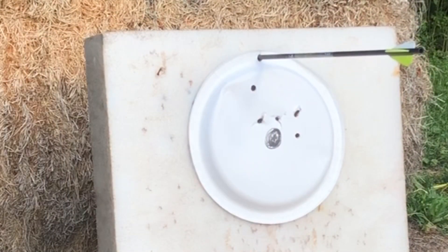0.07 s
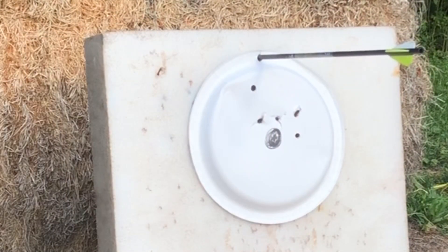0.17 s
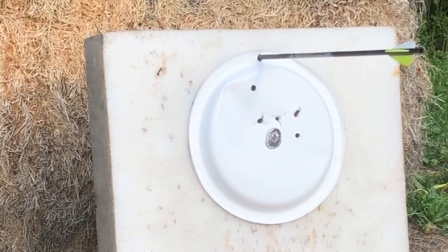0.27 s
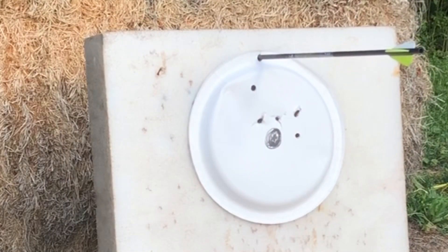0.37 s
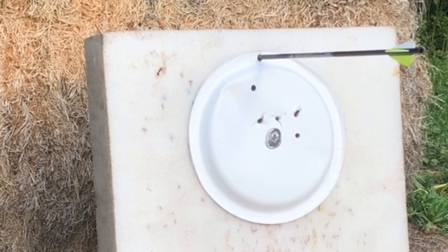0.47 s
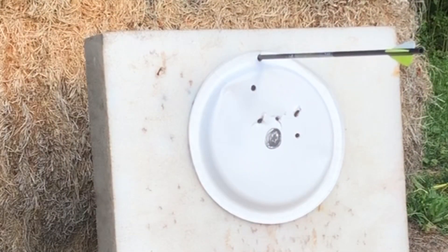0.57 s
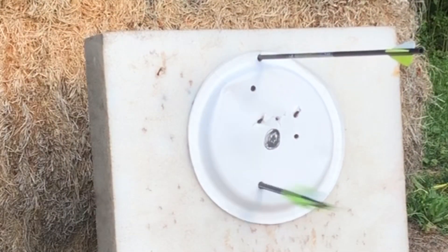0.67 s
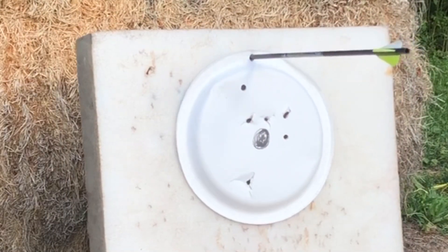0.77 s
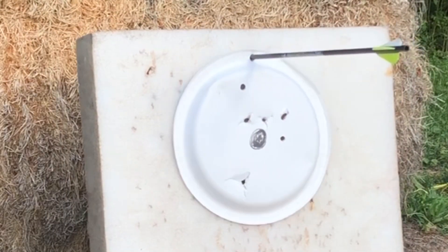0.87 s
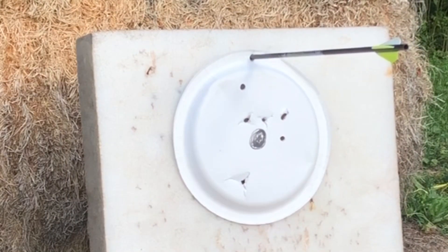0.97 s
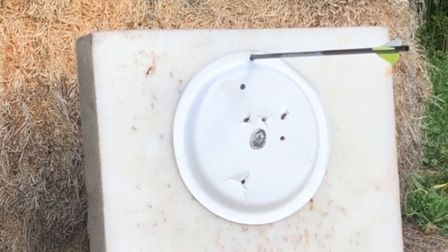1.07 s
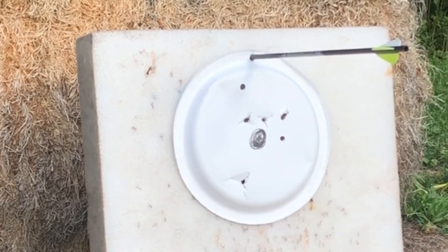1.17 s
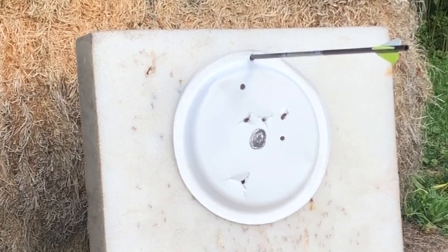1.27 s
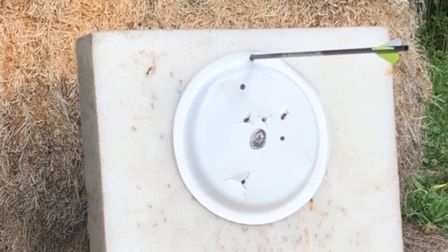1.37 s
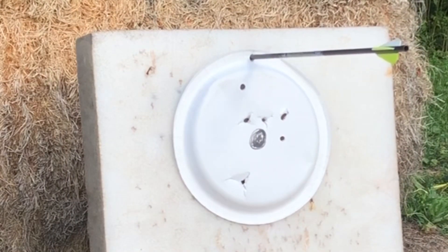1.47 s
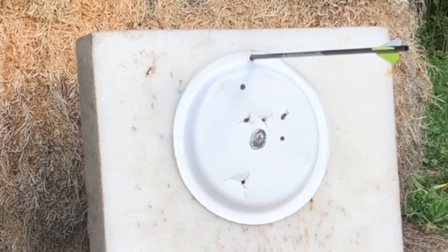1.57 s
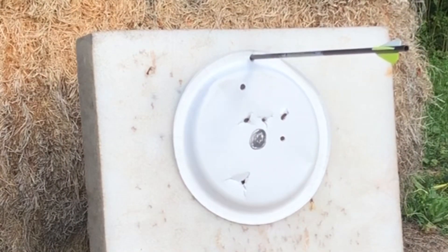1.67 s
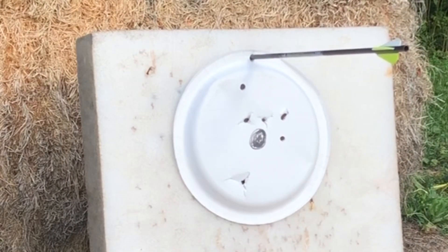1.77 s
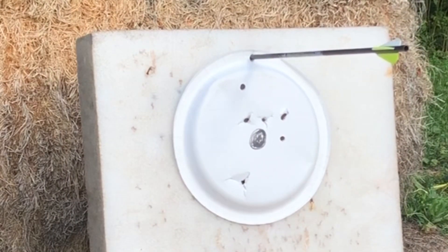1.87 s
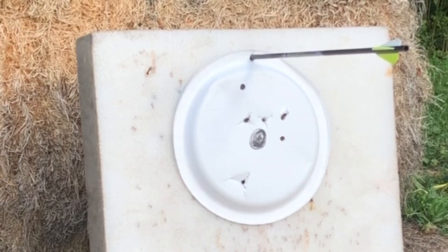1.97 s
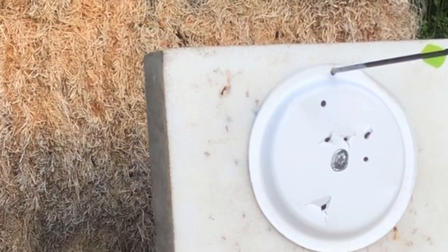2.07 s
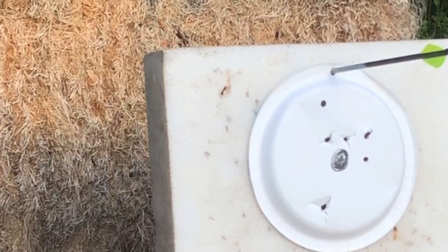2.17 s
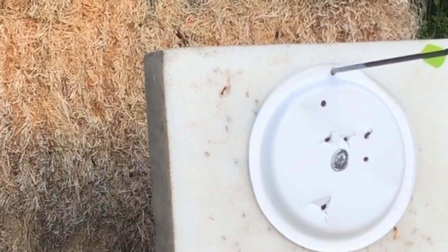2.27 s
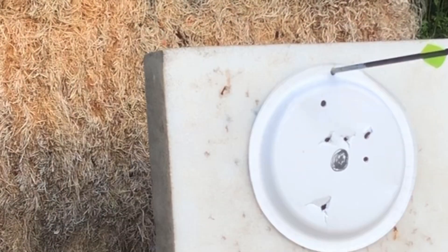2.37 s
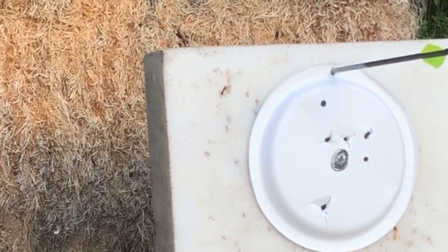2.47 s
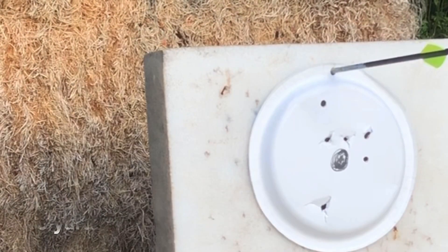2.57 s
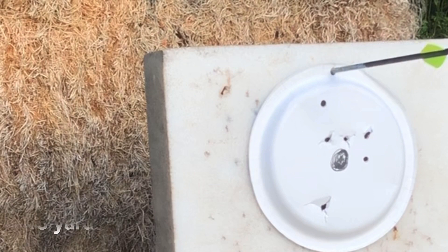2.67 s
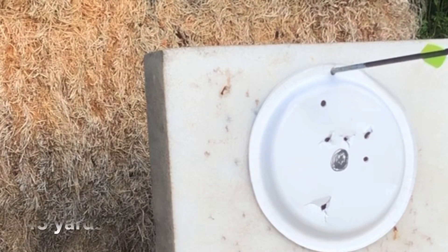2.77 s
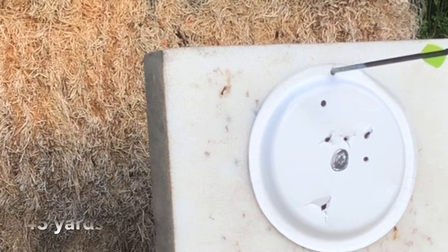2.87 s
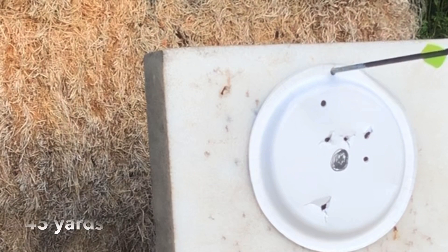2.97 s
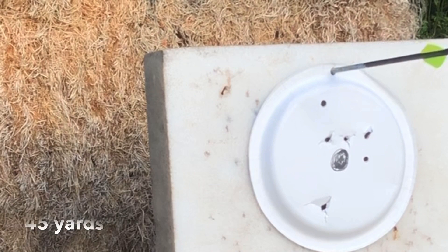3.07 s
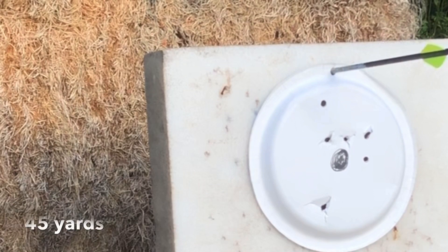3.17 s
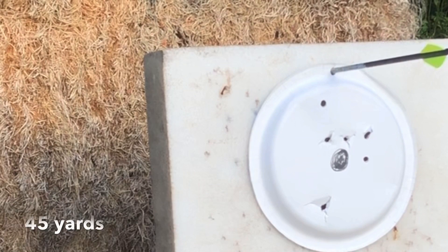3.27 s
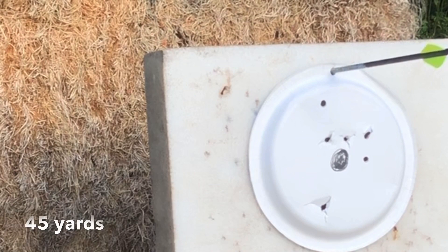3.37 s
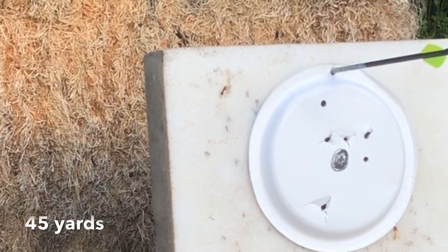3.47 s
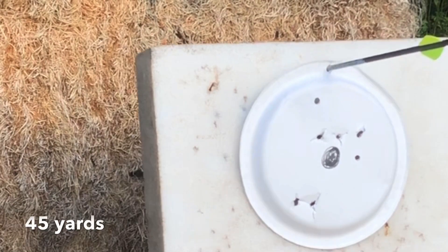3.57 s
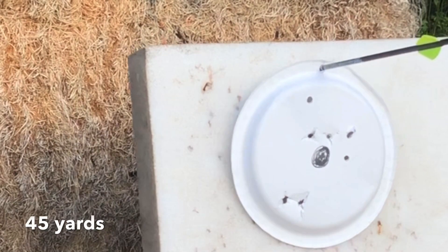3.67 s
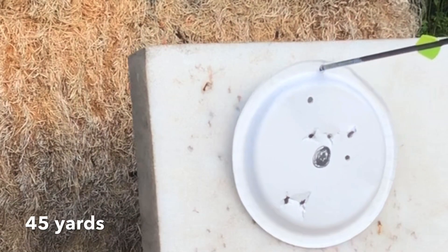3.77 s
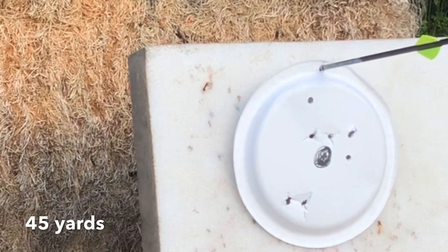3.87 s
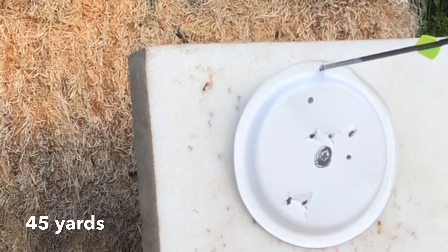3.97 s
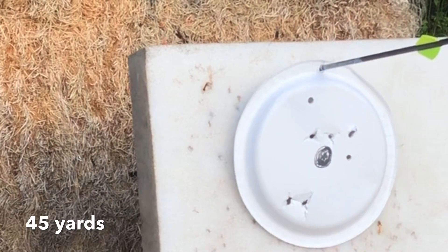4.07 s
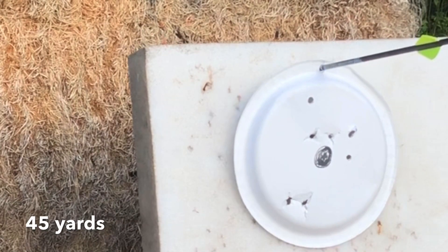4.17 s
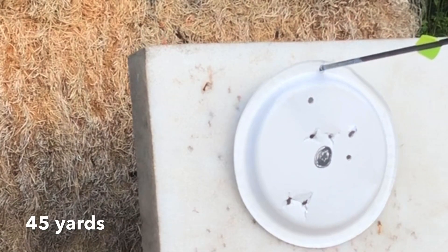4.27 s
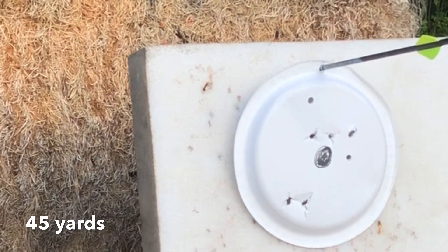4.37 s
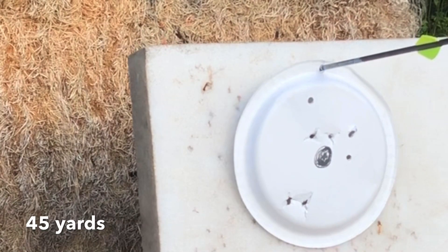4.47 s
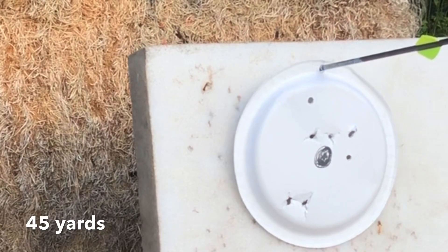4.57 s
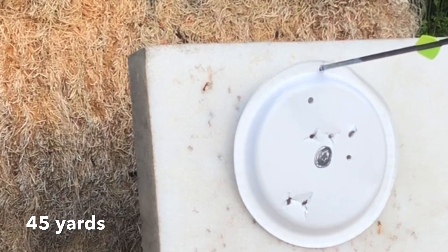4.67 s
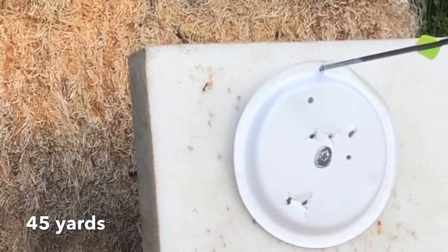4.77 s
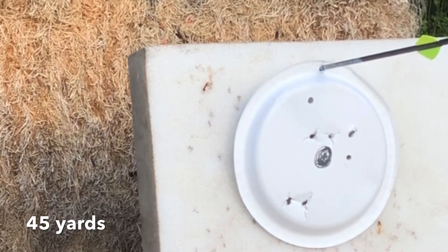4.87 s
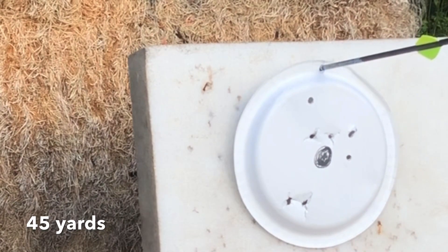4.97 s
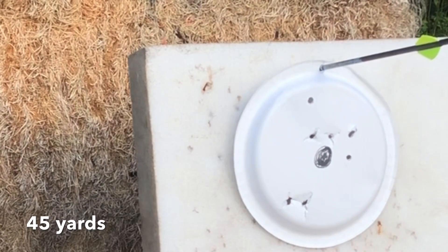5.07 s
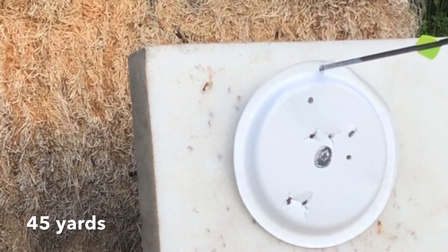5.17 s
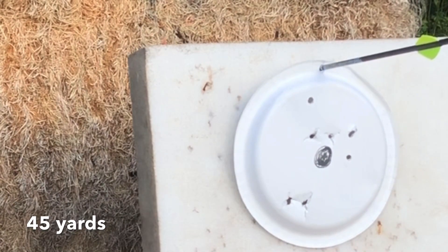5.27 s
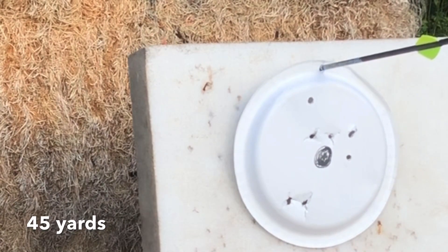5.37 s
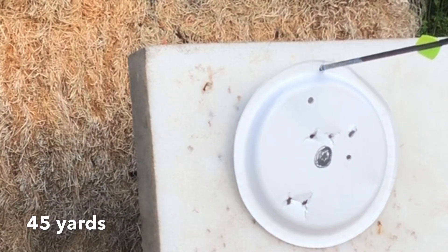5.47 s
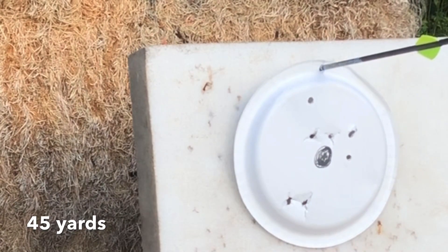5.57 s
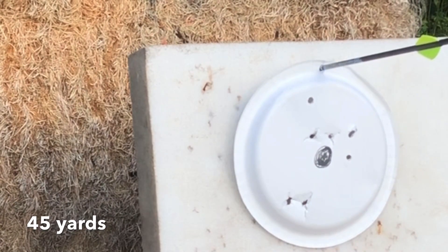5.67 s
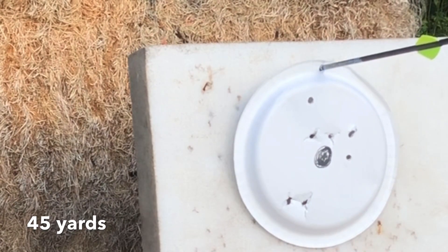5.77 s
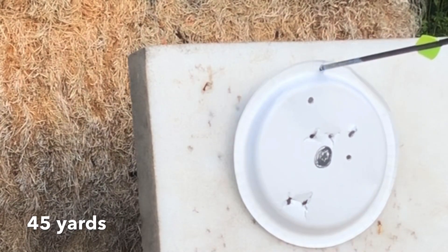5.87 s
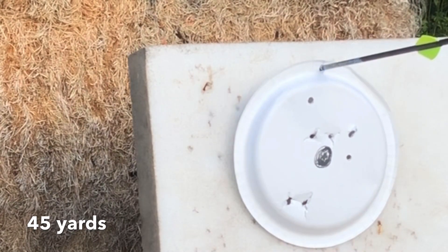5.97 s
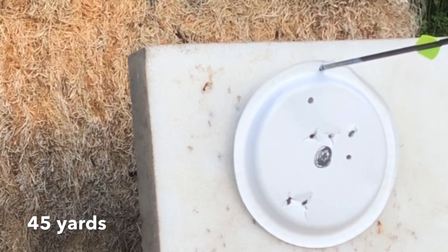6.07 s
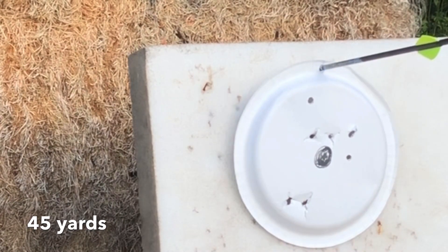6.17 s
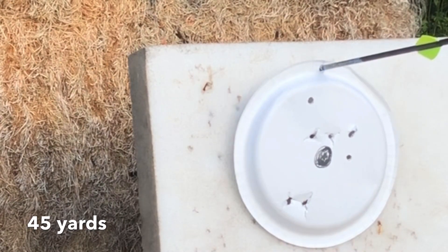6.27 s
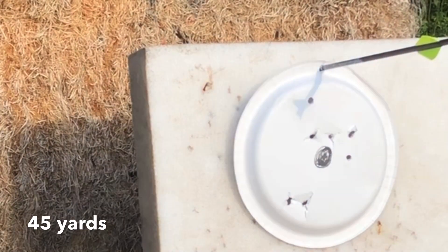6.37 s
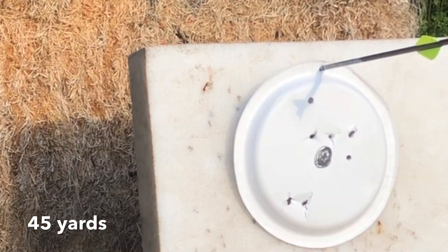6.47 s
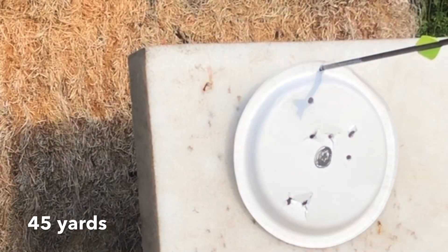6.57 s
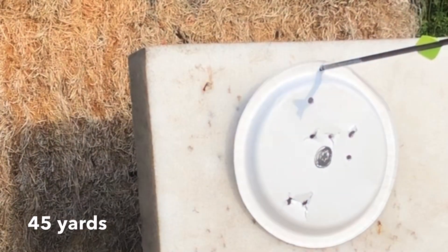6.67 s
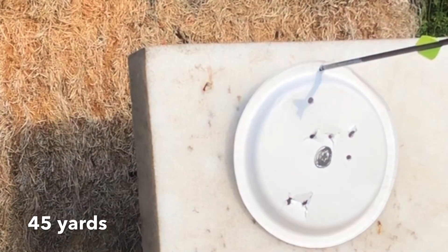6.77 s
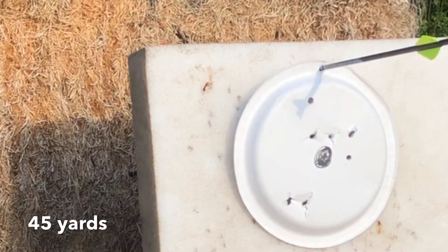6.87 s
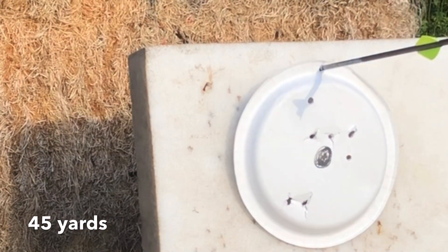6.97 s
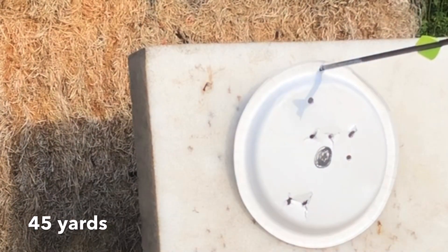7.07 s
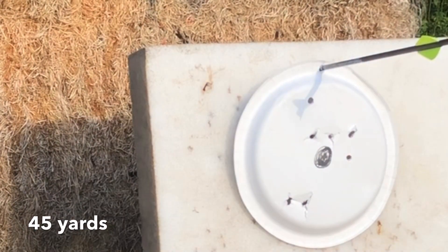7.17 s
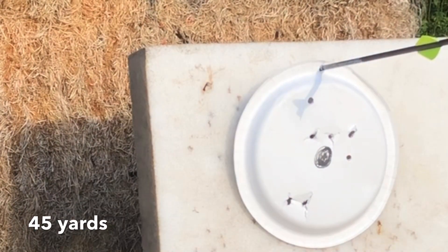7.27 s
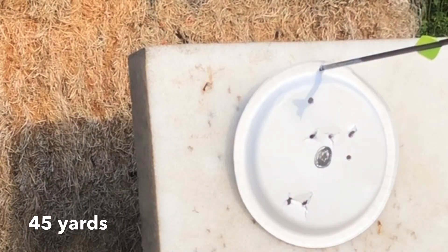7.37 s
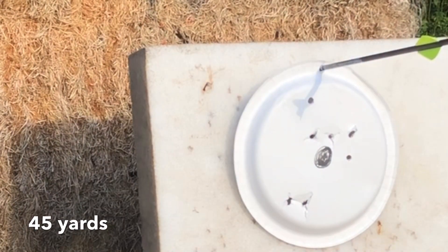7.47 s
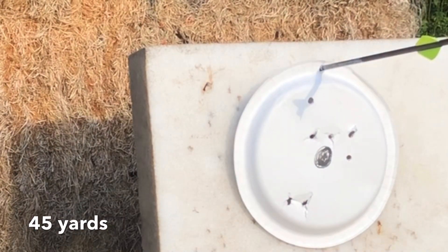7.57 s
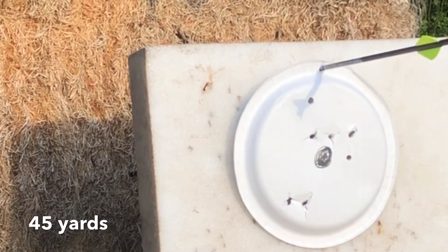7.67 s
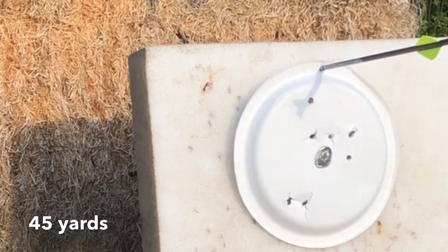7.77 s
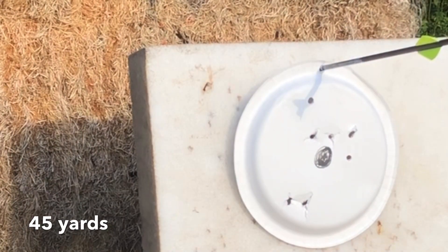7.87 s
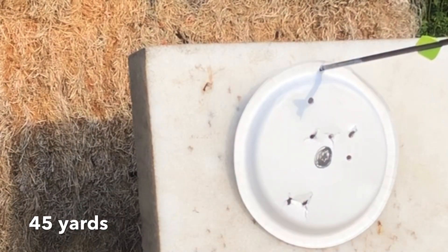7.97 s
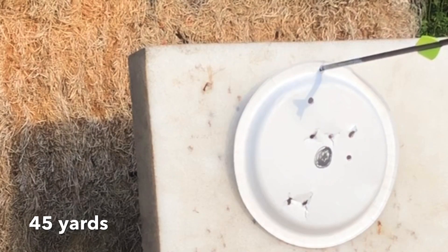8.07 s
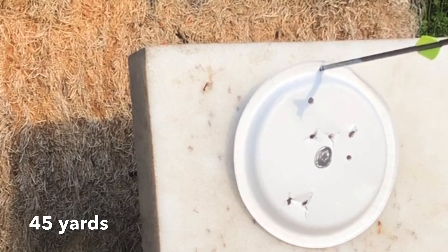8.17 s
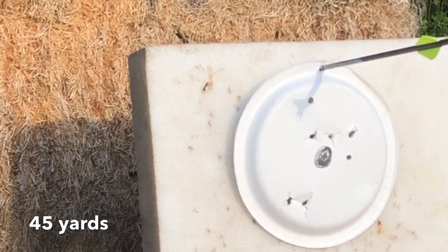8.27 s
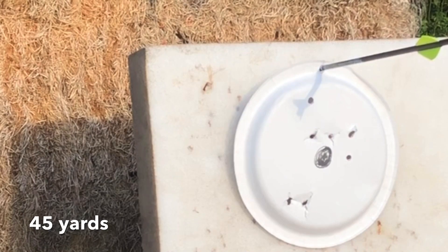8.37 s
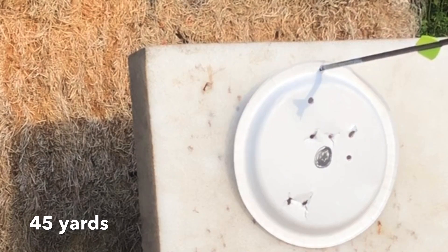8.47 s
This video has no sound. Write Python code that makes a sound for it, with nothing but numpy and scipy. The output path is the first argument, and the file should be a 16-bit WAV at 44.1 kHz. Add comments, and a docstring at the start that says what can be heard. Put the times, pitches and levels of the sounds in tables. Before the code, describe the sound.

Outdoors, crickets drone steadily over a low rumble and a fading far engine. A distant bow snaps, a bolt hisses in, and a very loud double crack with a dull foam thump bursts close to the microphone, echoing in the trees. After a cut the breeze buffets more and a second shot does the same. After another cut it is calm until a faint third bow snap at the very end.

```python
"""Crickets drone over a low rumble in a summer field, with a far engine that fades and faint bird calls.
A far bow snaps; the bolt hisses in past the microphone, cracks a paper plate and thumps the foam block beside it.
A second shot follows, and a third bow snap, fainter, whose bolt does not land before the end.
Filtered noise makes snaps, hiss and cracks; damped modes ring bow, plate and block; trees and ground answer.
Three takes are joined by cuts, each with its own background levels; loud cracks turn down the recorder's gain."""
import sys
import numpy as np
from scipy import signal
from scipy.fft import rfft, irfft
from scipy.io import wavfile
from scipy.ndimage import uniform_filter1d

SR = 44100
rng = np.random.default_rng(int(sys.argv[2]) if len(sys.argv) > 2 else 0)


def dump(signal):
    """Clip the signal to [-1, 1] and save it as 16-bit WAV at the path in sys.argv[1]."""
    limited = np.clip(np.atleast_2d(signal).T, -1, 1)
    pcm = np.round(limited * 32767).astype(np.int16)
    wavfile.write(sys.argv[1], SR, pcm)


N = 375732
TIME = np.arange(N) / SR  # s

# Three takes joined by cuts. Each row: start in seconds, depth of the background's fade at that cut (0-1),
# rumble in dB, air in dB, crickets at the start in dB, their swell in dB/s, breeze at the start in dB,
# added near scatter in dB.
TAKES = [(0, 0, -46, -57, -54, 0.7, -56, -1.5), (2.095, 0.5, -48.5, -55.5, -55, -0.26, -38.5, 2.5),
         (6.362, 0.93, -47.5, -57, -54.5, 0, -50.5, .5)]
CUT_FADE_S = 0.019  # from the fade's centre to 1/e of its depth

# Colours of the background. Each row: frequency in Hz, relative level in dB per Hz.
RUMBLE_COLOUR = [(15, -37.5), (35, -18), (55, -5.5), (85, -3), (108, 0.5), (140, -8), (190, -7.5),
                 (250, -12.5), (330, -23), (600, -34.5), (2000, -76.5)]
DISTANT_AIR_COLOUR = [(100, -1), (330, 6), (600, -2), (1000, 0.5), (1500, -3), (2200, -10.5), (3200, -14.5),
                      (4600, -16), (9000, -21), (13000, -23.5), (16000, -22.5)]
CRICKET_CHORUS_COLOUR = [(5500, -50), (6400, -26.5), (6800, -15), (7080, -6.5), (7250, -4.5), (7370, -0.5),
                         (7520, -3.5), (7700, -6.5), (7950, -10.5), (8200, -22), (8900, -34),
                         (11000, -59.5)]
BUFFET_COLOUR = [(12, -35.5), (30, -17.5), (55, -3.5), (90, 1), (125, -0.5), (160, -8), (220, -24),
                 (400, -49.5), (2000, -89.5)]
BREEZE_FADE_DB_PER_S = 1.0  # the breeze slackens through each take

# Nearer crickets, then smaller insects. Each row: frequency in Hz, nominal width in Hz, relative level in dB.
NEAR_CRICKETS = [(7400, 70, -10), (7636, 50, -15), (7950, 20, -21)]
SMALL_INSECTS = [(5460, 690, 0), (10060, 110, -15), (14950, 420, -11.5)]
SMALL_INSECTS_DB = -14.5  # against the crickets

# The far engine picks up speed as it draws away.
ENGINE_START_HZ, ENGINE_TOP_HZ, ENGINE_REV_S = 207, 222, 0.6
ENGINE_START_DB, ENGINE_FADE_DB_PER_S = -40.5, 7.5

# Far birds. Each row: start in seconds, length in seconds, top pitch in Hz before waver, level in dB before
# the blur of the trees, frequency ratio of a second tone, its level in dB against the first.
BIRD_CALLS = [(2.366, 0.27, 2375, -64, 4 / 3, -8), (4.88, 0.22, 2330, -63, 4 / 3, -7.5),
              (7.629, .16, 2020, -63.5, 2, 1)]
# Blur of the calls. Each row: frequency in Hz, level in dB; then frequency in Hz, 60 dB decay time in s.
BIRD_BLUR_COLOUR = [(1000, -3), (5000, -4)]
BIRD_BLUR_T60 = [(1000, 0.75), (5000, 0.75)]

# Small dry ticks. Each row: start in seconds, level in dB.
DRY_TICKS = [(5.776, -59), (8.3535, -51), (8.3597, -43.5), (8.371, -46)]
# Their colour. Each row: frequency in Hz, relative level in dB per Hz.
TICK_COLOUR = [(1500, -25), (4000, 4), (9000, -2), (16000, -8)]

# Bow releases. Each row: time of the snap in seconds, level in dB, boost of the modes under 500 Hz in dB,
# whirr of the flying bolt in dB, flight time in seconds, frequency in Hz above which distance dulls the whirr.
BOW_RELEASES = [(.481, -16.5, 3, -36.5, 0.2, 12000), (3.3633, -16, 4.5, -38, .165, 14900),
                (8.376, -35.5, 4, -52.5, 0.33, 6500)]
# Limbs, string and stock. Each row: frequency in Hz, relative level in dB, 60 dB decay time in seconds.
BOW_MODES = [(210, -18.5, 0.058), (280, -15.5, 0.11), (376, -10, 0.078), (414.8, -16.5, .06),
             (527, -15, 0.067), (624, -15, 0.11), (1743, -12, 0.033), (2030, -14, .028),
             (2610, -18.5, 0.066), (3262, -10, .035), (3580, -6.5, .035), (4060, -11.5, 0.029),
             (4530, -13.5, 0.038), (5232, -18, 0.044)]
# Colours of the bow and its bolt. Each row: frequency in Hz, relative level in dB per Hz.
STRING_COLOUR = [(500, -31), (2200, -19.5), (3300, 0.5), (5000, -1.5), (6500, -18.5), (16000, -30.5)]
SNAP_COLOUR = [(200, -7.5), (1700, 0.5), (4500, -2), (8000, -14), (16000, -14)]
WHIRR_COLOUR = [(150, -7.5), (500, -4.5), (1200, -7), (2600, -5), (3650, 1.5), (4700, -3), (6000, -1.5),
                (9000, -6), (16000, -12.5)]

# Bolts passing the microphone. Each row: time of the closest point in seconds, level in dB, closest distance
# in metres, lowest hiss in Hz, low wake in dB against the level, time left until the target in seconds.
BOLT_PASSES = [(.641, -10, 0.55, 1701, -15.5, .013), (3.517, -9, .36, 3600, -22.5, .0105)]
BOLT_SPEED_M_PER_S = 110
# Turbulence off the vanes and behind the bolt. Each row: frequency in Hz, relative level in dB per Hz.
VANE_COLOUR = [(100, -5), (1000, -10), (3500, 2), (7000, 0), (11000, -1), (16000, -8)]
WAKE_COLOUR = [(20, -25), (70, -6.5), (200, 2), (500, -1), (1300, -4), (2500, -4.5), (6000, -24),
               (16000, -45.5)]

# The point bursts the plate, then the shaft rasps into the foam. Each row: start in seconds, level in dB,
# hold in seconds, decay in seconds, body of the plate in dB against the level.
PLATE_CRACKS = [(0.6538, -1, 0.0008, 0.00081, -5.5), (0.6581, -0.5, .0015, .001, -8),
                (3.5266, -2.5, 0.00033, 0.0013, -4.5), (3.531, -5.5, 0.00029, 0.002, -3)]
# Paper plate pinned by the shaft. Each row: frequency in Hz, relative level in dB, 60 dB decay time in seconds.
PAPER_MODES = [(840, -16.5, .06), (948, -19, .05), (1220, -21, .04), (1395, -14, .04), (1980, -11.5, .03),
               (2490, -17.5, .025)]
# The block takes the blow and rocks. Each row: start in seconds, level in dB, pitch factor, knock in dB
# against the level.
BLOCK_THUDS = [(.657, -15, 1.13, -3), (0.6758, -6, 1.13, -9), (0.701, -24.5, 1.13, -8.5),
               (3.533, -12.5, 1.1, -2.5), (3.5438, -4.5, 1.01, -11.5)]
# Foam block. Each row: frequency in Hz before the pitch factor, relative level in dB, 60 dB decay in seconds.
FOAM_MODES = [(66.4, -4, .075), (118.2, 0, 0.12), (170, -2, 0.074), (247, -4.5, 0.077), (403, -16, 0.054),
              (510, -21, .04), (867, -18, .05)]
# Colours of the hit. Each row: frequency in Hz, relative level in dB per Hz.
CRACK_COLOUR = [(100, -11.5), (900, -1), (2500, -2.5), (6000, -3), (11000, -2.5), (16000, -3.5)]
PLATE_COLOUR = [(100, -9.5), (600, -8.5), (1300, -1), (2300, -2.5), (3500, -13), (8000, -30.5),
                (16000, -43.5)]
KNOCK_COLOUR = [(20, -18), (60, -3), (280, 3), (600, -9), (1000, -6.5), (1600, -11), (3000, -27),
                (8000, -45), (16000, -56)]

# Scatter from trees, bales and ground. Each row: frequency in Hz, level in dB before the take's own.
SCATTER_COLOUR = [(80, -26.5), (400, -30), (1200, -27.5), (3000, -16.5), (6000, -20), (10000, -22.5),
                  (16000, -24)]
# Its dying away. Each row: frequency in Hz, 60 dB decay time in seconds.
NEAR_SCATTER_T60 = [(100, .35), (1000, 0.56), (3000, 0.45), (8000, 0.68), (15000, .33)]
# Later answer of the treeline. Each row: frequency in Hz, level in dB before the lift in scene().
TREELINE_COLOUR = [(100, -40), (600, -43), (2500, -31.5), (5000, -35.5), (9000, -47.5), (16000, -61.5)]
# Its dying away. Each row: frequency in Hz, 60 dB decay time in seconds.
TREELINE_T60 = [(300, 1.5), (3000, 1.6), (10000, 1.1)]

# The recorder's gain control: a crack turns it down fast, and it recovers very slowly.
LIMIT_DB, DUCK_S, RECOVER_DB_PER_S = -10, 0.0095, 0.4
TOP_EDGE_HZ = 15750  # upper band limit


def amp(db):
    """Turns decibels into an amplitude factor."""
    return 10 ** (np.asarray(db) / 20)


def unit(x):
    """Scales to rms 1."""
    return x / np.sqrt(np.mean(x ** 2) + 1e-20)


def read(points, hz):
    """Reads a table between its points on a log-frequency axis."""
    f, value = np.transpose(points)
    return np.interp(np.log(hz + 1), np.log(f + 1), value)


def add(mix, s, sound):
    """Mixes a sound in at a time in seconds, cutting what runs past the end."""
    part = mix[round(s * SR):][:len(sound)]
    part += sound[:len(part)]


def noise(colour, size=N):
    """Steady noise of rms 1: the colour's spectrum with random phases."""
    hz = np.fft.rfftfreq(size, 1 / SR)
    phases = np.exp(2j * np.pi * rng.random(len(hz)))
    return unit(irfft(phases * amp(read(colour, hz)), size))


def wander(rate_hz):
    """Random drift of rms 1, no faster than about the given rate."""
    hz = np.fft.rfftfreq(N, 1 / SR)
    spectrum = rfft(rng.standard_normal(N)) * np.exp(-(hz / rate_hz) ** 2)
    return unit(irfft(spectrum, N))


def burst(colour, hold, decay, size=SR // 3):
    """A puff of noise that holds briefly and dies, with shallow random notches in its colour."""
    t = np.arange(size) / SR
    shape = np.exp(-np.maximum(t - hold, 0) / decay)
    spectrum = rfft(rng.standard_normal(size) * shape)
    softened = spectrum / np.sqrt(abs(spectrum) + 1e-12)  # makes the random notches shallower
    tint = amp(read(colour, np.fft.rfftfreq(size, 1 / SR)))
    puff = irfft(softened * tint, size) * shape ** 0.11
    return unit(puff) * np.sqrt(np.mean(shape ** 2))


def ring(modes, pitch, rise):
    """Damped modes set going by a push of finite length."""
    t = np.arange(SR // 3) / SR
    tones = sum(amp(db - 60 * t / t60) * np.sin(2 * np.pi * hz * pitch * t) for hz, db, t60 in modes)
    return (1 - np.exp(-t / rise)) * tones


def trills(rows):
    """Narrow fuzzy tones of insect wings, wandering in strength and phase."""
    out = np.zeros(N)
    for hz, width, db in rows:
        drift = wander(width * 0.7) + 1j * wander(width * 0.7)
        out += amp(db) * unit((drift * np.exp(2j * np.pi * hz * TIME)).real)
    return out


def echoes(x, colour, t60, delay, rise, size=19):
    """Outdoor scatter: each band's energy comes back late as a diffuse wash and dies at its own speed."""
    hz, t, z = signal.stft(x, SR, nperseg=256, noverlap=192)
    power = abs(uniform_filter1d(abs(z) ** 2, size, axis=0))  # smeared over neighbouring bands
    age = np.maximum(t[t < 2] - delay, 0)
    band_t60 = np.maximum(read(t60, hz), 0.02)[:, None]
    decay = amp(-60 * age / band_t60) * (1 - np.exp(-age / rise))
    decay = decay / np.linalg.norm(decay, axis=1, keepdims=True)
    late_power = abs(signal.fftconvolve(power, decay ** 2, axes=1)[:, :len(t)])
    grain = signal.stft(rng.standard_normal(N), SR, nperseg=256, noverlap=192)[2]
    wash = grain / grain.std() * np.sqrt(late_power) * amp(read(colour, hz))[:, None]
    return signal.istft(wash, SR, nperseg=256, noverlap=192)[1][:N]


def take_settings():
    """Gives every sample the time since its take began and that take's settings."""
    rows = np.array(TAKES)
    start, fade, *settings = rows[np.searchsorted(rows[1:, 0], TIME)].T
    return TIME - start, *settings


def field(age, rumble_db, air_db, cricket_db, swell):
    """Rumble, distant air and a chorus of crickets whose wing strokes throb."""
    rumble = amp(rumble_db + 1.5 * wander(4.1)) * noise(RUMBLE_COLOUR)
    air = amp(air_db + 0.5 * wander(5)) * noise(DISTANT_AIR_COLOUR)
    throb_depth, throb_hz = 0.18, 46.4
    strokes = 1 + throb_depth * np.sin(2 * np.pi * np.cumsum(throb_hz + wander(3)) / SR)
    rasp = amp(-1.0 * wander(260))
    crickets = rasp * strokes * (noise(CRICKET_CHORUS_COLOUR) + trills(NEAR_CRICKETS))
    insects = amp(SMALL_INSECTS_DB) * trills(SMALL_INSECTS)
    return rumble + air + amp(cricket_db + swell * age) * (crickets + insects)


def breeze(age, level_db, gust_db=0.76):
    """Lumpy low buffeting of the microphone; the breeze slackens through each take."""
    return amp(level_db - BREEZE_FADE_DB_PER_S * age + gust_db * wander(11)) * noise(BUFFET_COLOUR)


def engine(overtone_db=-23, waver_hz=3.0, fading_db=2.5):
    hz = ENGINE_TOP_HZ + (ENGINE_START_HZ - ENGINE_TOP_HZ) * np.exp(-TIME / ENGINE_REV_S)
    phase = 2 * np.pi * np.cumsum(hz + waver_hz * wander(14)) / SR
    level = amp(ENGINE_START_DB - ENGINE_FADE_DB_PER_S * TIME + fading_db * wander(8))
    level = level * (TIME < TAKES[1][0])
    return level * (np.sin(phase) + amp(overtone_db) * np.sin(2 * phase))


def birds(arch=0.22, waver=0.0118, fading_db=5.0):
    """Thin arched cries of two tones from far off, broken up and blurred by the trees."""
    calls, jitter = np.zeros(N), wander(90)
    for s, length, top_hz, db, ratio, overtone_db in BIRD_CALLS:
        u = np.linspace(0, 1, round(length * SR))
        bend = 1 - arch * (u - 0.3) ** 2 + waver * jitter[round(s * SR):][:len(u)]
        phase = 2 * np.pi * np.cumsum(top_hz * bend) / SR
        tones = np.sin(phase) + amp(overtone_db) * np.sin(ratio * phase)
        add(calls, s, amp(db) * signal.windows.tukey(len(u), 0.4) * tones)
    direct = 0.5 * calls * amp(fading_db * wander(25))
    return direct + echoes(calls, BIRD_BLUR_COLOUR, BIRD_BLUR_T60, 0.04, 0.02, size=1)


def ticks(decay=0.0005):
    """Tiny bright clicks, each a very short puff of noise."""
    out = np.zeros(N)
    for s, db in DRY_TICKS:
        add(out, s, amp(db) * burst(TICK_COLOUR, 0.0003, decay))
    return out


def bow():
    """The string whips forward, snaps on its stops and rings the limbs; the bolt whirrs away."""
    travel, stop, echo = 0.0075, 0.002, 0.035  # s: string before the snap, ringing and reflection after it
    string_db, snap_db, stock_db, rattle_db, echo_db = -15, -2, -19, -16, -22  # against the shot's level
    out, whirr = np.zeros((2, N))
    for s, db, thump_db, whirr_db, flight, top_hz in BOW_RELEASES:
        add(out, s - travel, amp(db + string_db) * burst(STRING_COLOUR, travel, 0.004))
        add(out, s, amp(db + snap_db) * burst(SNAP_COLOUR, 0.00017, 0.00048))
        limbs = [(hz, level + thump_db * (hz < 500), t60) for hz, level, t60 in BOW_MODES]
        stock = amp(stock_db) * burst(KNOCK_COLOUR, 0.001, 0.009)
        rattle = amp(rattle_db) * burst(SNAP_COLOUR, 0.0005, 0.0085)
        add(out, s + stop, amp(db) * (ring(limbs, 1, 0.00024) + stock + rattle))
        # a dull reflection
        add(out, s + echo, amp(db + echo_db) * burst(PLATE_COLOUR, 0.0037, 0.022))
        age = np.arange(round(flight * SR)) / SR
        swell = (1 - np.exp(-age / 0.038)) * signal.windows.tukey(len(age), 0.1)
        # air dulls a far bolt
        dulled = [(hz, level - 10 * np.log10(1 + (hz / top_hz) ** 2)) for hz, level in WHIRR_COLOUR]
        add(whirr, s, amp(whirr_db) * swell * noise(dulled, size=SR)[:len(age)])
    return out + whirr * amp(0.33 * wander(90))  # the shaft wobbles in flight


def bolts(falloff=1.5, flutter_db=2.5):
    """Turbulence off the vanes swells as the bolt rushes past and ends when it lands."""
    out = np.zeros(N)
    for s, db, closest, low_hz, wake_db, left in BOLT_PASSES:
        nearness = closest / np.hypot(closest, BOLT_SPEED_M_PER_S * (TIME - s))
        flying = np.interp(TIME - s, [-0.15, -0.08, left, left + 0.005], [0, 1, 1, 0])
        highpass = signal.butter(2, low_hz, "high", fs=SR, output="sos")
        hiss = signal.sosfilt(highpass, noise(VANE_COLOUR)) * nearness ** falloff  # it beams sideways
        wake = amp(wake_db) * noise(WAKE_COLOUR) * nearness
        out += amp(db + flutter_db * wander(400)) * flying * (hiss + wake)
    return out


def target(plate_decay=0.0025, knock_decay=0.0038, push=0.0032):
    """Two quick cracks through plate and foam, then the dull rocking of the block's damped modes."""
    out = np.zeros(N)
    for s, db, hold, decay, body_db in PLATE_CRACKS:
        plate = burst(PLATE_COLOUR, hold, plate_decay) + ring(PAPER_MODES, 1, 0.00053)
        add(out, s, amp(db) * (burst(CRACK_COLOUR, hold, decay) + amp(body_db) * plate))
    for s, db, pitch, knock_db in BLOCK_THUDS:
        knock = amp(knock_db) * burst(KNOCK_COLOUR, 0.0031, knock_decay)
        add(out, s, amp(db) * (ring(FOAM_MODES, pitch, push) + knock))
    return out


def gain_control(x, size=441):
    """Gain that drops by the loudest excess above the bass so far; it starts afresh with each take."""
    sensed = signal.sosfilt(signal.butter(2, 500, "high", fs=SR, output="sos"), x)
    power = signal.lfilter(np.ones(size) / size, 1, sensed ** 2)  # mean over the last 10 ms
    excess_db = np.maximum(10 * np.log10(power + 1e-12) - LIMIT_DB, 0)
    recovery = RECOVER_DB_PER_S * TIME
    cuts = [round(s * SR) for s, *_ in TAKES[1:]]
    parts = np.split(excess_db + recovery, cuts)
    duck_db = np.concatenate([np.maximum.accumulate(part) for part in parts]) - recovery
    r = np.exp(-1 / (DUCK_S * SR))
    return amp(-signal.lfilter([1 - r], [1, -r], duck_db))


def scene(treeline_db=2.5):
    """Shots and their echoes over a background that fades briefly out and in at each cut between takes."""
    age, rumble_db, air_db, cricket_db, swell, breeze_db, scatter_db = take_settings()
    background = field(age, rumble_db, air_db, cricket_db, swell) + breeze(age, breeze_db) + engine() + birds()
    cut_fades = np.ones(N)
    for s, depth, *_ in TAKES:
        cut_fades *= 1 - min(depth, 1) * np.exp(-((TIME - s) / CUT_FADE_S) ** 2)
    shots = ticks() + bow() + bolts() + target()
    near = echoes(shots * amp(scatter_db), SCATTER_COLOUR, NEAR_SCATTER_T60, 0.022, 0.014)
    far = amp(treeline_db) * echoes(shots, TREELINE_COLOUR, TREELINE_T60, 0.12, 0.044)
    return (shots + near + far + cut_fades * background)[None]


def record(dry):
    """The cracks turn the gain down and still clip the recorder; then the band limit."""
    clipped = np.clip(dry * gain_control(dry[0]), -1, 1)
    lowpass = signal.firwin(1023, TOP_EDGE_HZ, window=("kaiser", 9), fs=SR)
    return signal.oaconvolve(clipped, lowpass[None], "same")


dry = scene()
out = record(dry)
dump(out)
```